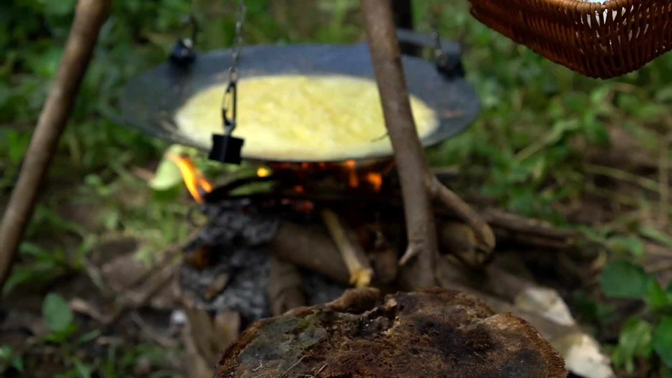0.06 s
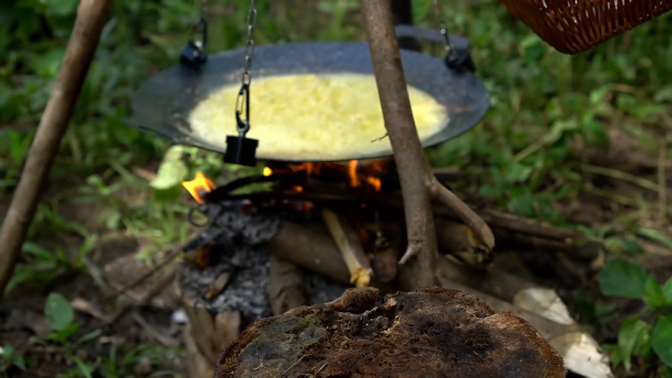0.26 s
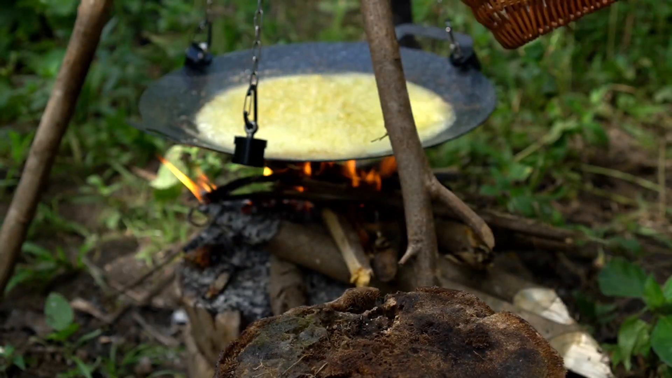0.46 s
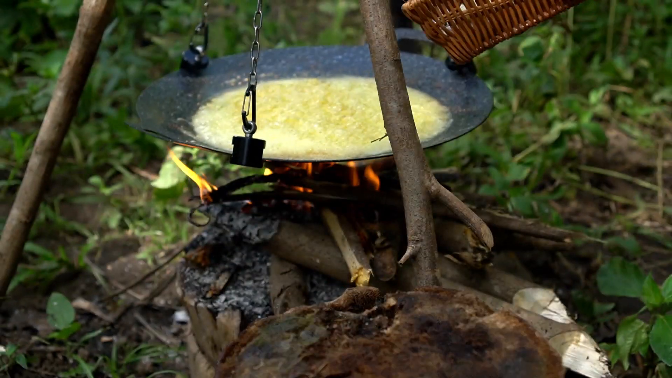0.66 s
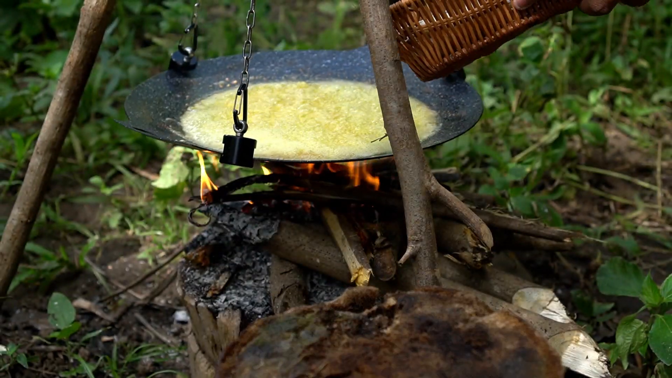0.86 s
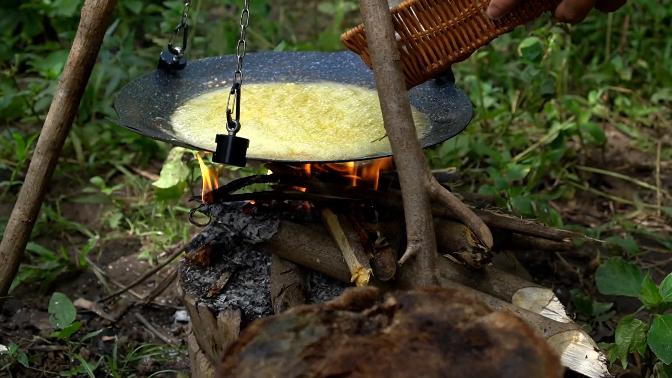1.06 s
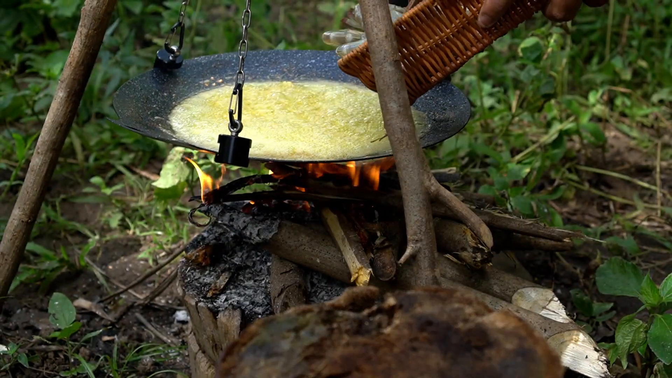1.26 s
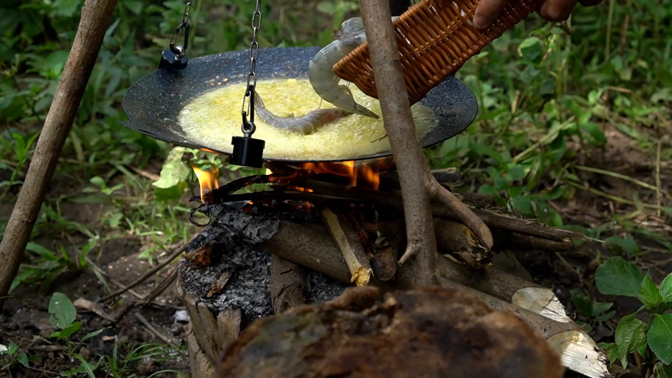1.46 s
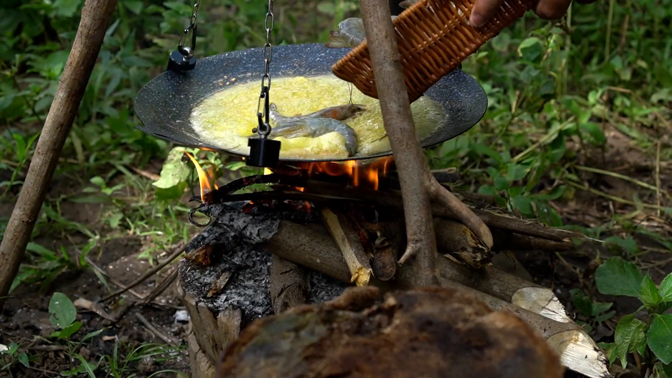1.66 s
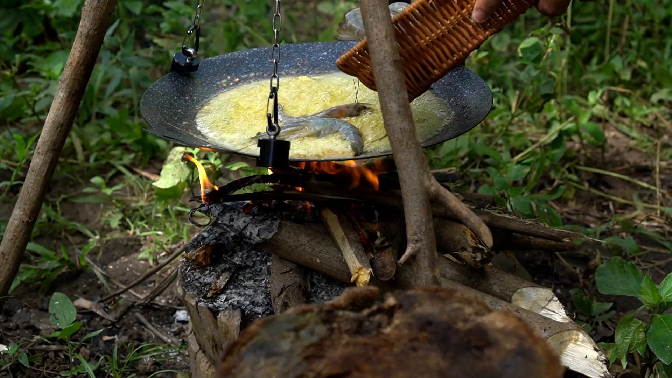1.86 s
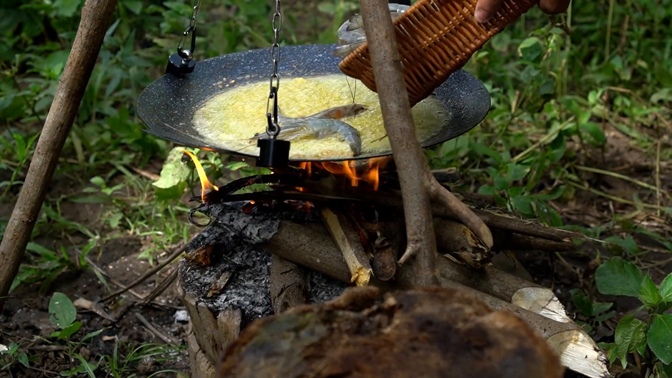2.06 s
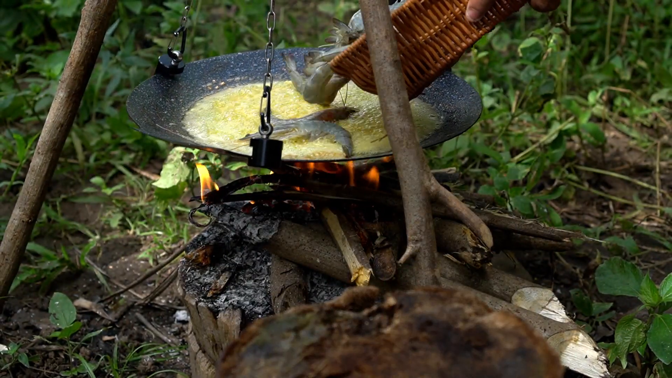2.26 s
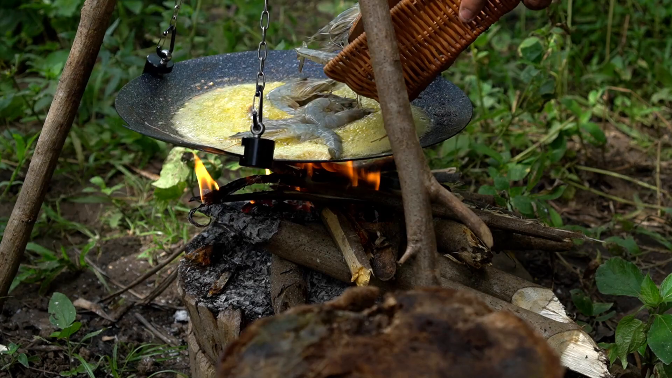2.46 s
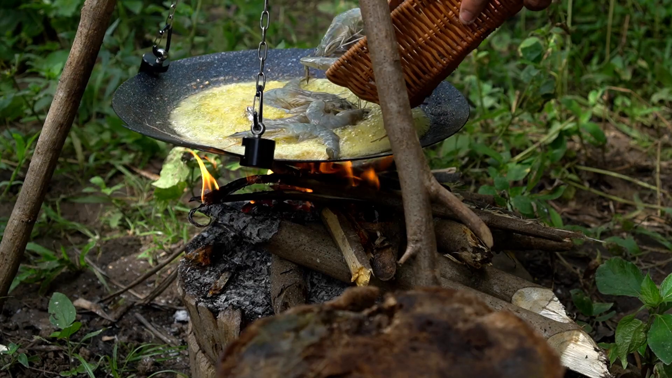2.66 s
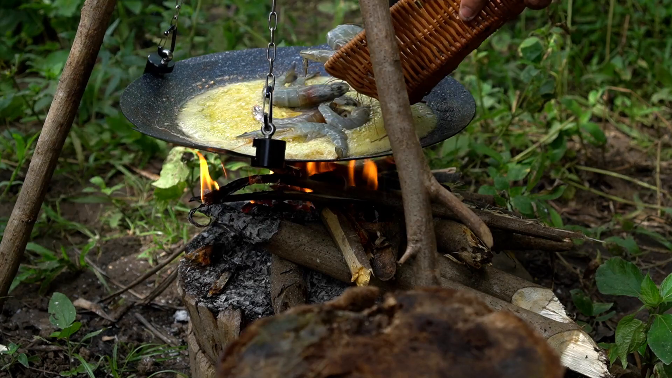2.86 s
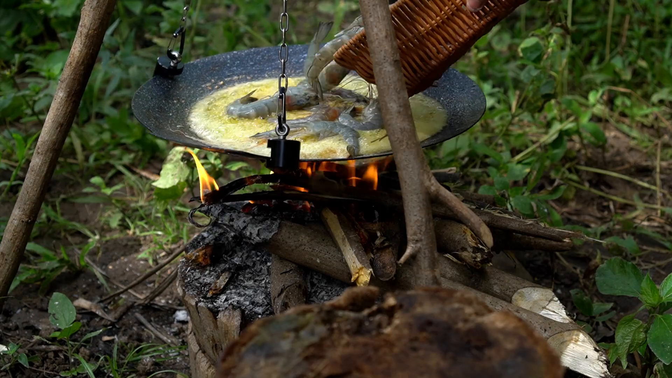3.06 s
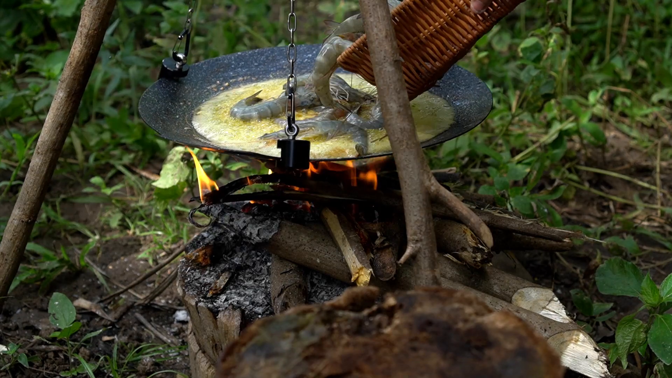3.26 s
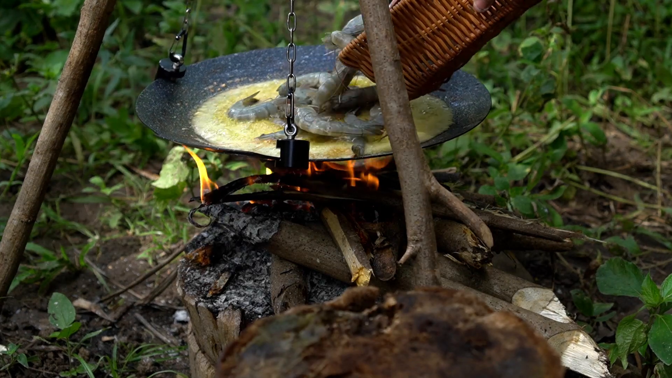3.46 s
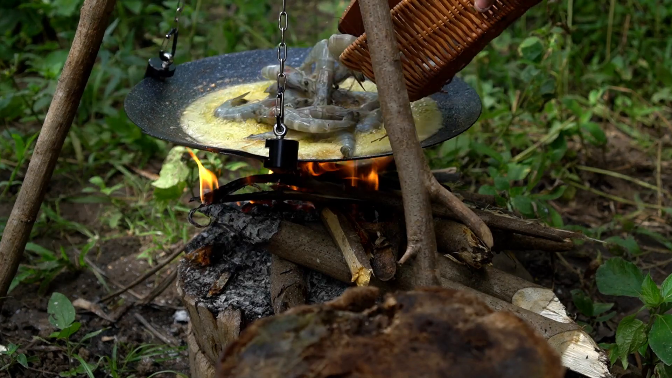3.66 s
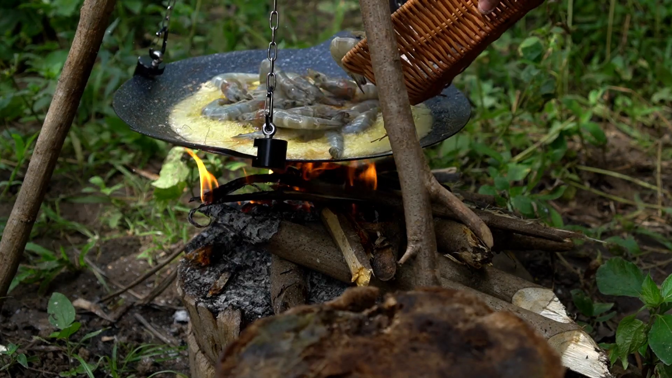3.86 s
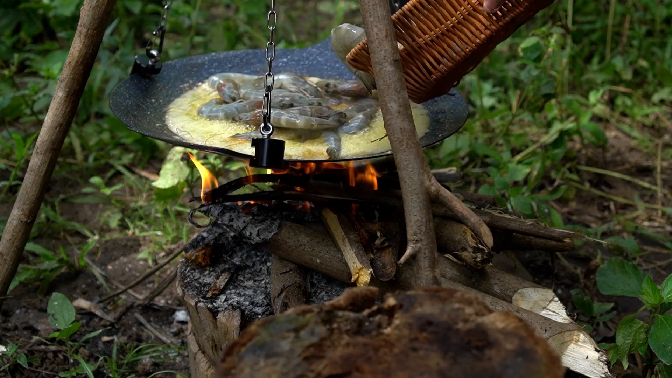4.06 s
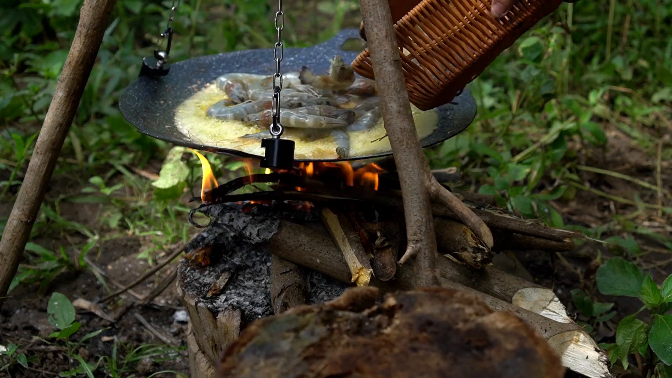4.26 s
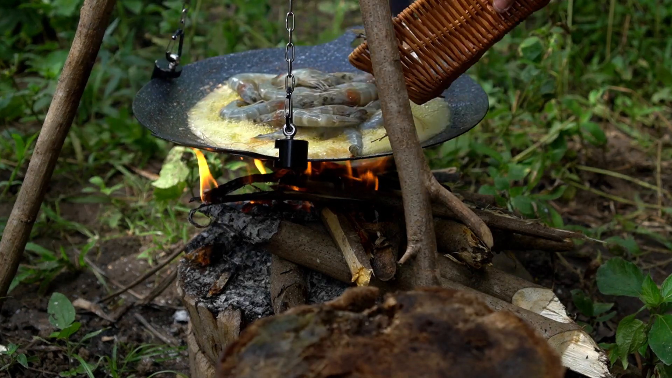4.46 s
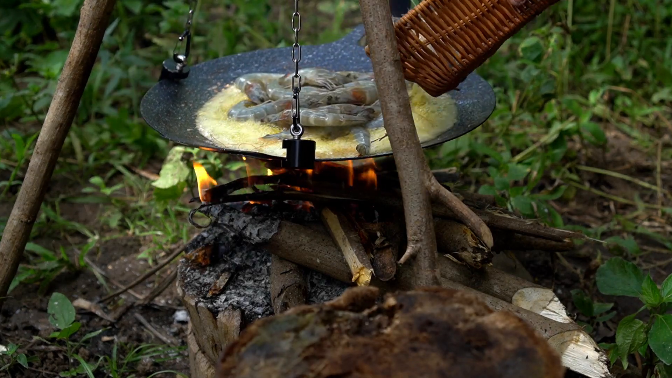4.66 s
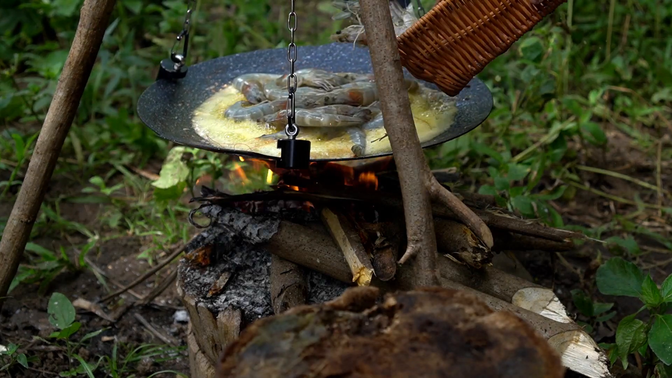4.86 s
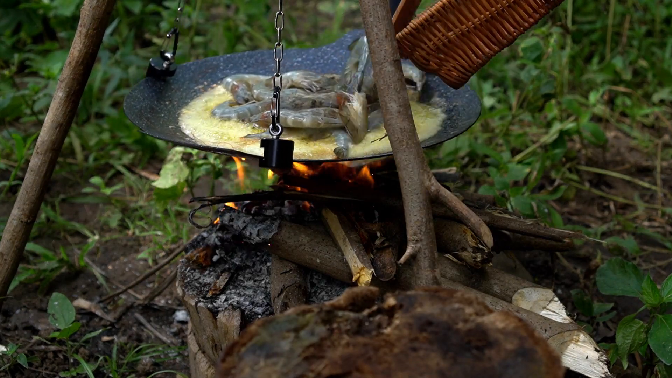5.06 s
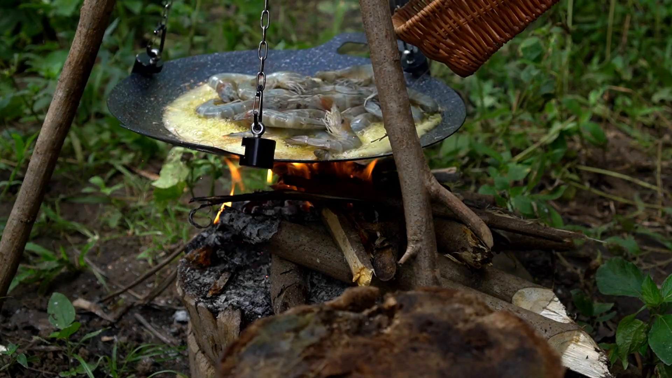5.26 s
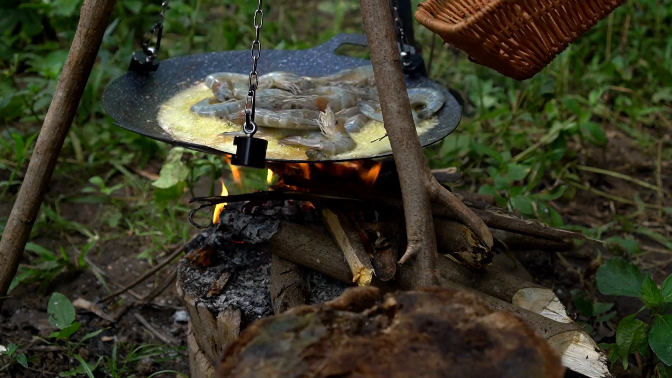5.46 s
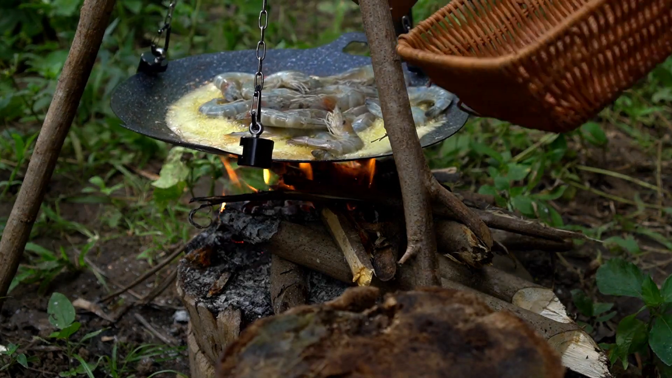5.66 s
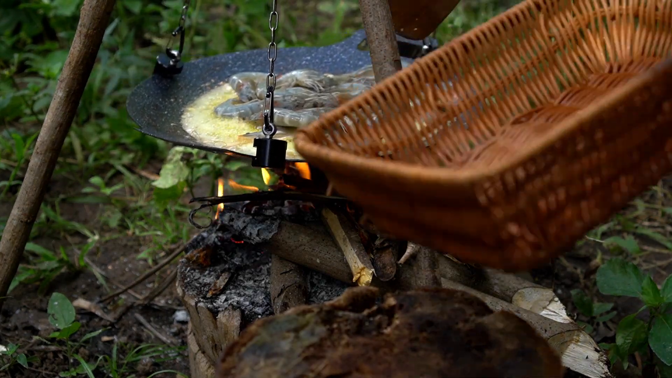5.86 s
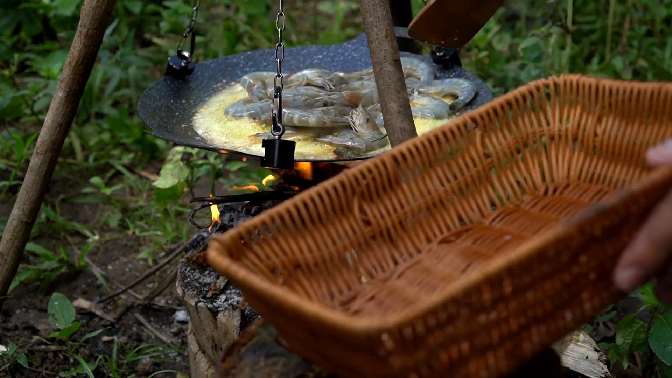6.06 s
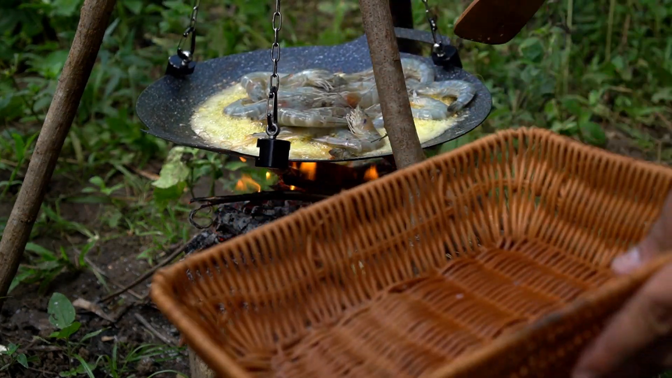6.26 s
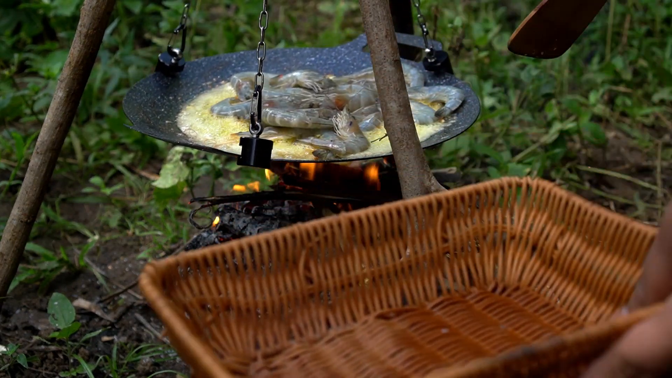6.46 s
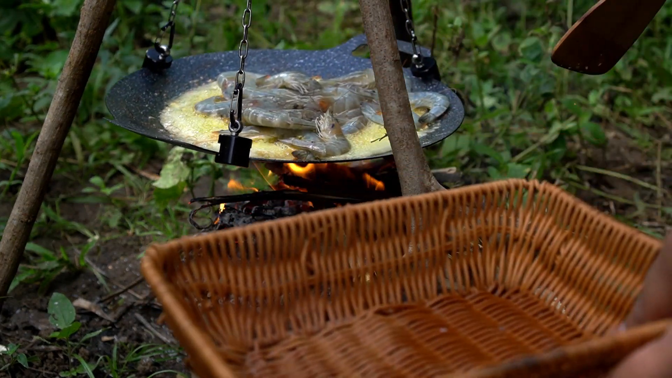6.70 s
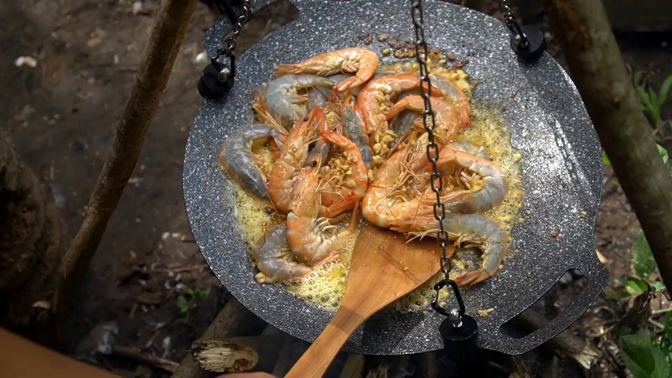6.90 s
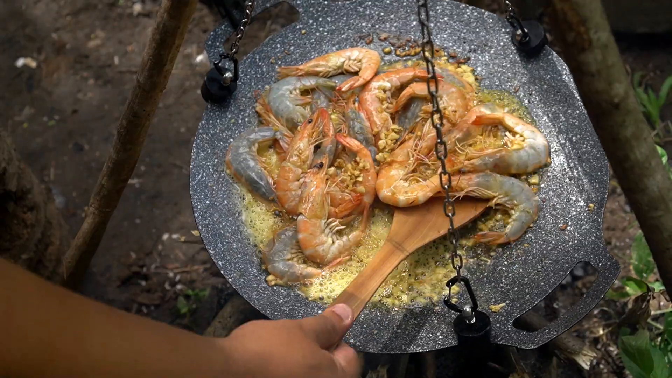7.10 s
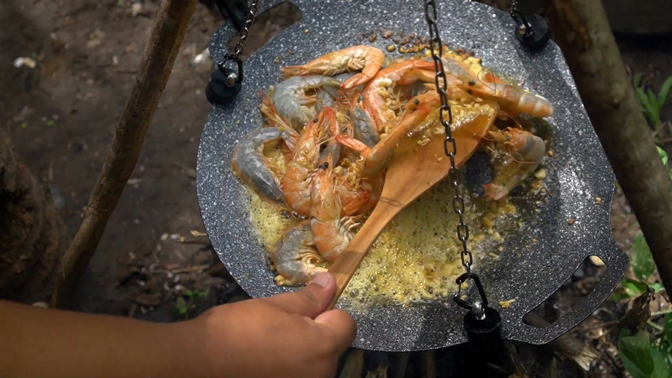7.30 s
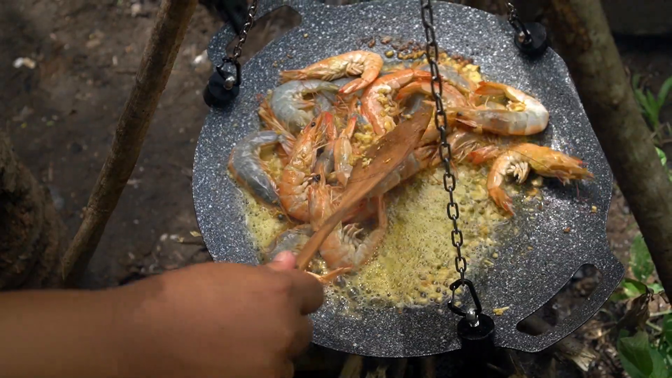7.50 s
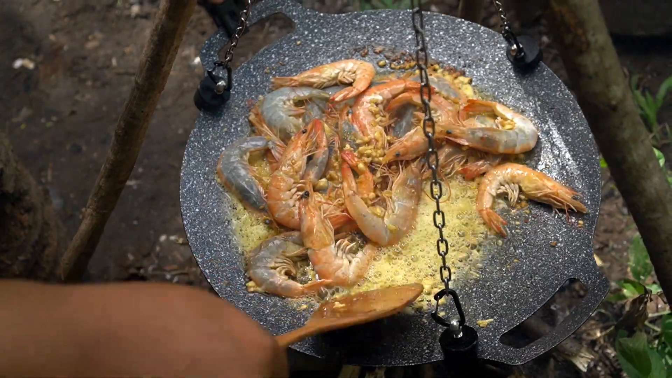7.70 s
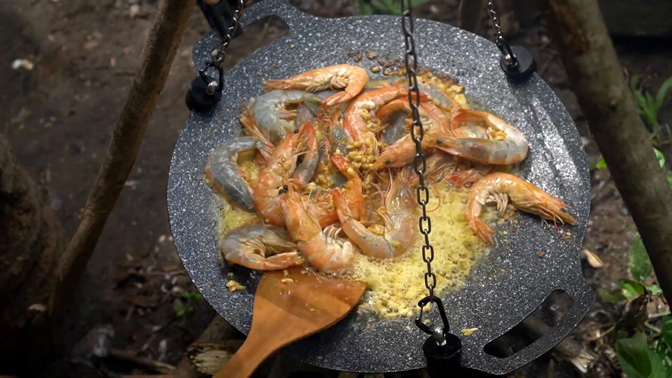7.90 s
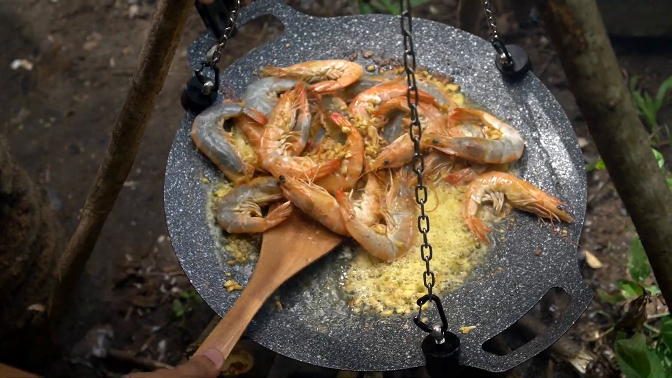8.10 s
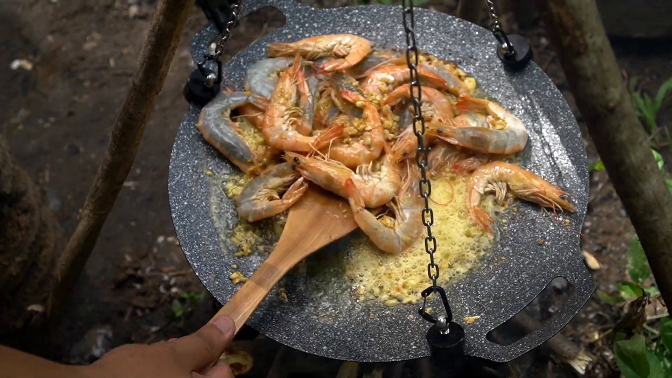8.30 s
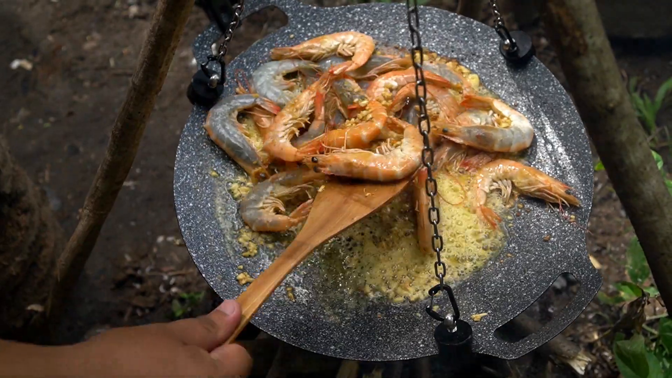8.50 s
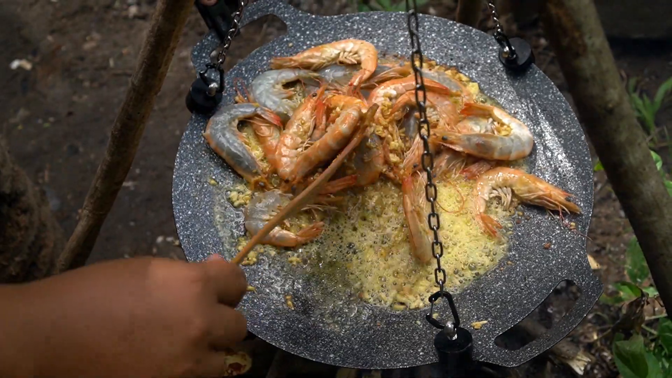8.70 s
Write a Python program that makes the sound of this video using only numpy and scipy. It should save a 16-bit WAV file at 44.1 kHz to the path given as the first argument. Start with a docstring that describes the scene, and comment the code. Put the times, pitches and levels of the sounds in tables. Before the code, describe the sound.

Close to a wok outdoors, a gentle hiss of foaming butter comes first, with a faint wicker rustle and a bird's chirp. Then shrimp drop into the fat and start to sizzle and gurgle, popping and spitting most in the middle. The sizzle rises, settles briefly and is at its fullest near the end as they are turned. Dry snaps of burning wood and a low wind rumble stay in the background.

```python
"""Shrimp frying in a wok

Shrimp slide from a wicker basket into foaming butter over a wood fire and are later turned with a
spatula. Their water boils in the hot fat, so it sizzles, gurgles, spits and plops. Behind this the
firewood snaps, a small bird chirps and moving air rumbles on the microphone.
A limiter turns the sound down briefly after the loudest pops."""
import sys
import numpy as np
from scipy import signal
from scipy.fft import rfft, irfft
from scipy.io import wavfile

SR = 44100
rng = np.random.default_rng(int(sys.argv[2]) if len(sys.argv) > 2 else 0)


def int16_out(signal):
    """Quantize to a 16-bit WAV file."""
    q = np.round(np.clip(np.atleast_2d(signal).T, -1, 1) * 32767)
    wavfile.write(sys.argv[1], SR, q.astype(np.int16))


N = 385434
TIME = np.arange(N) / SR
SIZZLE_STARTS_S = 1.7
USUAL_BURSTS_PER_S = 1700


def frying(sizzle_db, usual_db=-22, wetting_s=0.76):
    """Water spreads through the fat and boils; stirring bares hot metal, so the bursts come faster."""
    # Each push of the spatula throws up more spray: middle_s, half_length_s, extra_db
    pushes = [(7.478, 0.29, 2.5), (8.437, 0.16, 7)]
    swell_db = sizzle_db - usual_db
    stirred = ramp(start_s=6.95, rise_s=.45)
    thrown_db = 4 * stirred + sum(db * np.exp(-((TIME - s) / half) ** 2) for s, half, db in pushes)
    bursts_per_s = USUAL_BURSTS_PER_S * from_db(.9 * swell_db + 4.5 * stirred)
    spray_rate = np.minimum(bursts_per_s * from_db(thrown_db) ** 2, SR / 2)
    juice = gurgle(-29 + 0.33 * swell_db - stirred)   # stirring leaves less juice
    boiling = sizzle(sizzle_db, bursts_per_s, ring_db=-8 + 2 * stirred)   # and frees the wok to ring
    droplets = spray(-36.5 + 0.98 * swell_db + thrown_db, spray_rate)
    wetted = np.sqrt(1 - np.exp(-np.maximum(TIME - SIZZLE_STARTS_S, 0) / wetting_s))
    return wetted * (juice + boiling + droplets)


def sizzle(level_db, per_s, ring_db):
    """Water boils off in clumps of tiny bursts over a smooth hiss; those on bare metal ring the wok."""
    # Tone of the boiling water: pitch_hz, level_db
    sizzle_colour = [(300, -23), (700, -17), (1500, -7), (2000, -3.5), (2450, -2.5), (3200, -0.5),
                     (3700, 1), (4250, -5), (5300, -2), (6300, -9), (7400, -19), (10000, -20.5),
                     (16000, -41)]
    unevenness = np.sqrt(np.minimum(USUAL_BURSTS_PER_S / per_s, 1))   # dense boiling evens out
    clumps = from_db(unevenness * (1.36 * drift(22) + 2.5 * drift(160)))
    grains = bubbles(clicks(per_s, spread_db=4.0, largest=3.9) * clumps, 914, 10500, cycles=7.9)
    hiss = 0.83 * rng.standard_normal(N)
    boiling = rms_one(coloured(grains + hiss, sizzle_colour))
    ringing = from_db(ring_db) * wok(clicks(.6 * per_s, spread_db=5.5, largest=5.0))
    return from_db(level_db) * (boiling + ringing)


def wok(taps):
    """Taps from inside make the loaded pan ring in a few broad bands."""
    # Where the metal rings: pitch_hz, width_hz, level_db
    rings = [(1990, 270, 3.5), (3000, 640, -8), (3460, 410, 4.5), (5150, 530, -12)]
    return rms_one(sum(from_db(db) * band_passed(taps, hz - width / 2, hz + width / 2, order=1)
                       for hz, width, db in rings))


def spray(level_db, rate):
    """The finest droplets tick with almost no ring; a few stand out."""
    # Tone of the fine mist: pitch_hz, level_db
    spray_colour = [(2000, -20), (5500, 12), (8200, 4), (9500, -1.5), (11000, 2), (14000, 0), (16000, -6)]
    ticks = bubbles(clicks(1.2 * rate, spread_db=4.5, largest=4.5), 5900, 20600, cycles=8.1)
    mist = ticks + 0.79 * rng.standard_normal(N)
    return from_db(level_db + 2.2 * drift(40)) * rms_one(coloured(mist, spray_colour))


def gurgle(level_db):
    """Larger bubbles boil up in the juice around the shrimp."""
    # Tone of the bubbling juice: pitch_hz, level_db
    gurgle_colour = [(250, -29.5), (480, -17.5), (660, -2), (880, -3), (1020, -2), (1200, -1), (1550, -4.5),
                     (1900, -1), (2600, -9), (5000, -53.5)]
    grains = bubbles(clicks(1500, spread_db=4.5, largest=3.8), 412, 3300, cycles=9.5)
    return from_db(level_db) * rms_one(coloured(grains, gurgle_colour))


def foam():
    """Countless small bubbles in the butter merge into a smooth wash."""
    # The foam is smothered as the wok fills: time_s, level_db
    foam_levels = [(0, -25), (3.5, -26), (6.55, -27), (6.9, -29.5), (8.3, -34), (8.74, -34.5)]
    # Tone of the foam: pitch_hz, level_db
    foam_colour = [(60, -13), (120, -5.5), (280, -3.5), (600, -2), (850, -1.5), (1000, 2), (1350, -2.5),
                   (2500, -5.5), (3500, -4), (4400, -9.5), (5400, -8.5), (7500, -20.5), (11000, -25.5),
                   (16000, -33)]
    return from_db(in_time(foam_levels)) * rms_one(coloured(rng.standard_normal(N), foam_colour))


def plops(shove_s=0.00037):
    """Trapped steam shoves the fat out and lets it fall back, and the hollow rings with a dry pop."""
    # Steam pockets bursting under the shrimp: start_s, level_db, pitch_hz, shove (0 to 1)
    pockets = [(1.493, -11, 650, 0), (1.703, -9.5, 620, .5), (3.488, -4, 1090, 0), (3.641, 3.5, 960, 0.15),
               (3.850, 1.5, 930, 0.84), (4.017, -3.5, 900, 0.06), (4.064, 4.5, 1330, 0.13),
               (4.634, -1.5, 730, 0), (4.752, 6, 756, 0.15), (4.929, -5, 1240, 0), (5.649, -2, 1340, 0.03),
               (6.577, -16, 406, .6), (6.653, 4.5, 1190, 0.06), (6.864, -4.5, 730, 0.2)]
    out = np.zeros(N)
    age = TIME[:SR // 10] / shove_s
    for s, db, hz, shove in pockets:
        push = shove * 2 * np.e * age * (1 - age / 2) * np.exp(-age)
        pop = burst(hz, cycles=9, spatter=1.4, spatter_s=.018, octaves=.9)
        pop = band_passed(pop, 0.39 * hz, 6000, order=3)
        add(out, s + 0.00049, from_db(db) * (pop + push))
    return out


def spits(sizzle_db, boiled_off_s=6.9, count=32):
    """Single water drops explode with a crack and a spatter; the small ones grow with the sizzle."""
    # The largest drops bursting in the fat: start_s, level_db, pitch_hz
    large_drops = [(1.848, -4, 4960), (1.908, -1.5, 4930), (1.955, -0.5, 4600), (2.219, 1.5, 4420),
                   (2.443, -2, 4160), (2.872, -2, 3720), (3.116, -4, 3740), (3.198, 0, 3830),
                   (3.486, -4, 1980), (3.518, -1, 3500), (3.641, 6.5, 3000), (3.851, 5.5, 1940),
                   (3.923, 2, 3840), (3.982, -3, 3280), (4.017, -2, 3400), (4.031, 2.5, 3300),
                   (4.055, -3, 3400), (4.243, -1, 3250), (4.400, 7, 3600), (4.578, 3, 3060),
                   (4.631, 3.5, 3770), (4.752, 3, 1300), (4.929, -1, 2520), (5.661, 0, 3380),
                   (6.05, 3.5, 5000), (6.130, 3, 2700), (6.266, -4, 3200), (6.905, 0, 3450),
                   (7.193, 2, 3250)]
    times = random_times(SIZZLE_STARTS_S, boiled_off_s, count)
    small_drops = []
    for s, (size, pitch) in zip(times, rng.standard_normal((count, 2))):
        db = np.interp(s, TIME, sizzle_db) + 13.5 + 2 * size
        small_drops.append((s, db, 3400 * 2 ** (.35 * pitch)))
    out = np.zeros(N)
    for s, db, hz in small_drops + list(large_drops):
        crack = 0.49 * rng.standard_normal(SR // 10) * fade(0.0006)
        pop = burst(hz, cycles=21.3, spatter=0.75, spatter_s=0.025, octaves=0.94)
        add(out, s + .0004, from_db(db) * (pop + crack))
    return low_passed(out, 4700)


def slaps():
    """Wet shrimp meet the hot fat with a short flash of steam."""
    # Shrimp landing: start_s, level_db, length_s
    landings = [(1.493, -20.5, 0.01), (1.698, -16.5, 0.019), (1.734, -21, 0.0064), (2.433, -25, 0.019),
                (4.046, -18, 0.016), (4.404, -8, 0.016), (6.893, -17.5, 0.013)]
    # Tone of the steam: pitch_hz, level_db
    slap_colour = [(60, -7), (600, -18), (1500, 2.5), (3000, 6), (6000, -1), (8000, -12), (16000, -25)]
    out = np.zeros(N)
    for s, db, length in landings:
        rush = rng.standard_normal(SR // 10)[:round(length * SR)]
        add(out, s, from_db(db) * rush * signal.windows.tukey(len(rush), .5))
    return coloured(out, slap_colour)


def fire(fade_s=0.0082, faint_db=-17, faint_hz=9000):
    """Burning wood fibres part with dry snaps; the thinner the fibre, the higher the snap."""
    # The louder snaps: start_s, level_db, lowest_hz
    snaps = [(.802, -5, 3970), (1.548, -13, 10500), (1.954, -16.5, 7000), (2.784, -3, 7200),
             (3.849, -10, 7500), (4.053, -8.5, 4900), (4.954, -9, 9000), (4.960, -8, 5600)]
    faint_snaps = [(s, faint_db, faint_hz) for s in random_times(0, TIME[-1], count=14)]
    out = np.zeros(N)
    for s, db, lowest_hz in faint_snaps + list(snaps):
        crack = band_passed(rng.standard_normal(SR // 10) * fade(fade_s), lowest_hz, 1.72 * lowest_hz)
        add(out, s + .0006, from_db(db) * crack / np.abs(crack).max())
    return out


def basket():
    """Wicker strands rub softly on each other as the basket is lifted."""
    # Rustles of the wicker: start_s, level_db, length_s, pitch_hz
    rustles = [(0.278, -25.5, 0.064, 2900), (0.313, -24.5, 0.052, 1800)]
    out = np.zeros(N)
    for s, db, length, hz in rustles:
        rub = band_passed(rng.standard_normal(SR // 4), 0.5 * hz, 1.3 * hz)[:round(length * SR)]
        add(out, s, from_db(db) * rms_one(rub) * np.hanning(len(rub)))
    return out


def bird(trill_hz=135, trill_depth_hz=400):
    """A small bird gives short rising whistles with a fast trill, scattered by the trees."""
    # Its calls: start_s, length_s, start_hz, top_hz, level_db
    chirps = [(0.192, 0.057, 4900, 5950, -22.5), (2.284, 0.043, 5000, 6220, -19.5),
              (2.404, 0.044, 4440, 5250, -16.5)]
    out = np.zeros(N)
    for s, length, start_hz, top_hz, db in chirps:
        t = TIME[:round(length * SR)]
        arch = np.sin(2 * np.pi / 3 * t / length)
        hz = start_hz + (top_hz - start_hz) * arch + trill_depth_hz * np.sin(2 * np.pi * trill_hz * t)
        whistle = np.sin(2 * np.pi * np.cumsum(hz) / SR)
        add(out, s, from_db(db) * np.sin(np.pi * t / length) * whistle)
    return scattered(out, echo_db=-11, fade_s=.2)


def air(calm_db=-43.5, edge_s=0.087):
    """Moving air rumbles on the microphone; each gust rises, holds and falls."""
    # Tone of the rumble: pitch_hz, level_db
    air_colour = [(10, -30), (22, -7), (33, 5.5), (48, -7), (80, -5), (120, -13.5), (400, -50), (2000, -80)]
    # Puffs of air: start_s, length_s, level_db, top_hz
    gusts = [(.03, .2, -39, 90), (.2, 6.9, -49, 70), (3.18, 0.29, -37, 100), (5.3, 0.66, -37, 49.7),
             (5.995, 0.49, -32, 65), (6.498, 1.1, -39, 44.7), (8.438, 0.44, -28, 100)]
    out = from_db(calm_db) * rms_one(coloured(rng.standard_normal(N), air_colour))
    rumble = coloured(rng.standard_normal(N), air_colour)
    for s, length, db, top_hz in gusts:
        swell = ramp(s, edge_s) - ramp(s + length - edge_s, edge_s)
        out += from_db(db) * swell * rms_one(low_passed(rumble, top_hz))
    return out


def scattered(x, echo_db=-17, fade_s=0.25):
    """Nearby surfaces, such as the pan and the ground, throw back a short spray of echoes."""
    echoes = rng.standard_normal(SR // 10) * fade(fade_s)
    return x + from_db(echo_db) * signal.oaconvolve(x, echoes / np.linalg.norm(echoes))[:N]


def clicks(per_s, spread_db, largest):
    """Random clicks, many small and a few large."""
    sizes = from_db(spread_db * np.minimum(rng.exponential(1, N), largest))
    signs = rng.choice([-1, 1], N)
    happens = rng.random(N) < per_s / SR
    return sizes * signs * happens / np.sqrt(per_s)


def bubbles(taps, low_hz, high_hz, cycles, count=24):
    """Each tap rings a bubble of a random size, which dies away in a few cycles."""
    size_of_tap = rng.integers(0, count, N)
    out = np.zeros(N)
    for size, hz in enumerate(np.geomspace(low_hz, min(high_hz, SR / 2 - 2000), count)):
        decay = from_db(-60 * hz / (cycles * SR))
        angle = 2 * np.pi * hz / SR
        own_taps = taps * (size_of_tap == size) + 1e-18
        out += signal.lfilter([angle, 0, -angle], [1, -2 * decay * np.cos(angle), decay ** 2], own_taps)
    return rms_one(out)


def burst(hz, cycles, spatter, spatter_s, octaves):
    """A hollow in the fat rings briefly while droplets add noise around its pitch."""
    tone = np.sin(2 * np.pi * hz * TIME[:SR // 10]) * fade(cycles / hz)
    drops = rng.standard_normal(len(tone)) * fade(spatter_s)
    drops = band_passed(drops, hz / 2 ** octaves, hz * 2 ** octaves)
    drops -= tone * (drops @ tone) / (tone @ tone)   # keep the ring itself out of the noise
    drops *= np.linalg.norm(tone) / np.linalg.norm(drops)
    return (tone + spatter * drops) / np.hypot(1, spatter)


def coloured(x, colour, size=8192):
    """Shape a sound's tone to follow rows of pitch_hz, level_db."""
    hz, db = np.transpose(colour)
    bins_hz = np.maximum(np.arange(size // 2 + 1) * SR / size, 1)
    gains = from_db(np.interp(np.log(bins_hz), np.log(hz), db))
    # Fold the filter in time so that nothing rings ahead of a click (minimum phase).
    cepstrum = irfft(np.log(gains))
    cepstrum[1:size // 2] *= 2
    cepstrum[size // 2 + 1:] = 0
    response = irfft(np.exp(rfft(cepstrum)))
    return signal.oaconvolve(x, response / np.linalg.norm(response))[:N]


def band_passed(x, low_hz, high_hz, order=2):
    """Keep what lies between two pitches."""
    edges_hz = [low_hz, min(high_hz, SR / 2 - 1000)]
    return signal.sosfilt(signal.butter(order, edges_hz, "band", fs=SR, output="sos"), x)


def low_passed(x, hz):
    """Keep what lies below a pitch."""
    return signal.sosfilt(signal.butter(2, hz, fs=SR, output="sos"), x)


def random_times(start_s, end_s, count):
    """One random moment in each of count equal slots."""
    return start_s + (end_s - start_s) * (np.arange(count) + rng.random(count)) / count


def drift(per_s):
    """A random wander with a typical size of 1."""
    points = rng.standard_normal(N // 40)
    return rms_one(np.interp(TIME * per_s, np.arange(len(points)), points))


def fade(fade_s):
    """A curve that falls 60 dB every fade_s, cut off after a tenth of a second."""
    return from_db(-60 * TIME[:SR // 10] / fade_s)


def ramp(start_s, rise_s):
    """A straight rise from 0 to 1."""
    return np.clip((TIME - start_s) / rise_s, 0, 1)


def in_time(rows):
    """Join rows of time_s, value with straight lines."""
    return np.interp(TIME, *np.transpose(rows))


def add(track, start_s, sound):
    """Mix a sound into a track."""
    at = round(start_s * SR)
    track[at:at + len(sound)] += sound[:max(N - at, 0)]


def from_db(db):
    """Turn decibels into a multiplier."""
    return 10 ** (np.asarray(db) / 20)


def rms_one(x):
    """Scale a sound to an average strength (rms) of 1."""
    return x / np.sqrt(np.mean(x ** 2) + 1e-20)


def limited(x, threshold_db=-3.5, release_db_per_s=280, attack_s=.002):
    """A limiter: the volume drops quickly on a loud peak, then creeps back."""
    over_db = np.maximum(20 * np.log10(np.abs(x) + 1e-9) - threshold_db, 0)
    recovery_db = release_db_per_s * TIME
    held_db = np.maximum.accumulate(over_db + recovery_db, axis=-1) - recovery_db
    smoothing = np.exp(-1 / (attack_s * SR))
    return x * from_db(-signal.lfilter([1 - smoothing], [1, -smoothing], held_db))


def scene():
    """Mix the wok, the fire under it and the outdoors into one channel."""
    # The sizzle swells as shrimp pile in, eases, and swells as they are turned: time_s, level_db
    sizzle_levels = [(1.7, -24.5), (2.5, -28), (3.3, -26), (3.8, -22), (4.15, -25), (4.45, -21),
                     (4.75, -24.5), (5.1, -17.5), (5.36, -16.5), (5.7, -19), (6.0, -22), (6.45, -21),
                     (6.98, -22), (7.45, -18.5), (8.2, -16), (8.74, -15.5)]
    sizzle_db = in_time(sizzle_levels)
    steady = foam() + frying(sizzle_db) + air()
    pops = scattered(plops() + spits(sizzle_db) + slaps() + fire())
    return (steady + pops + basket() + bird())[None]


def record(dry):
    """Limit the sound, clip the first instant of loud pops and cut the highest treble."""
    clipped = np.clip(limited(dry), -.8, .8)
    treble_cut = signal.ellip(14, .1, 100, 15900, fs=SR, output="sos")
    return signal.sosfilt(treble_cut, clipped)


dry = scene()
out = record(dry)
int16_out(out)
```